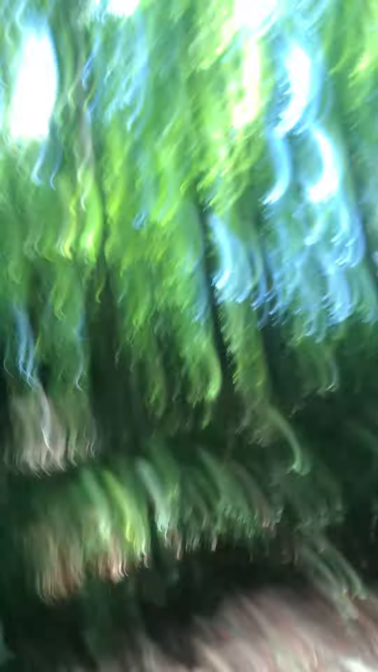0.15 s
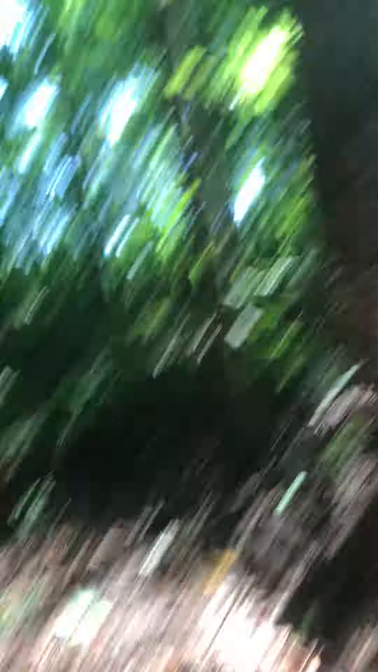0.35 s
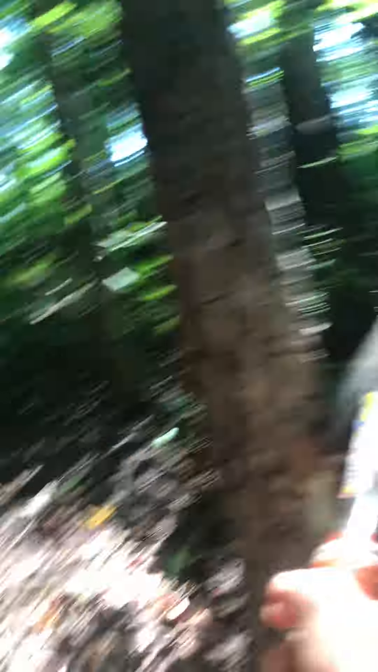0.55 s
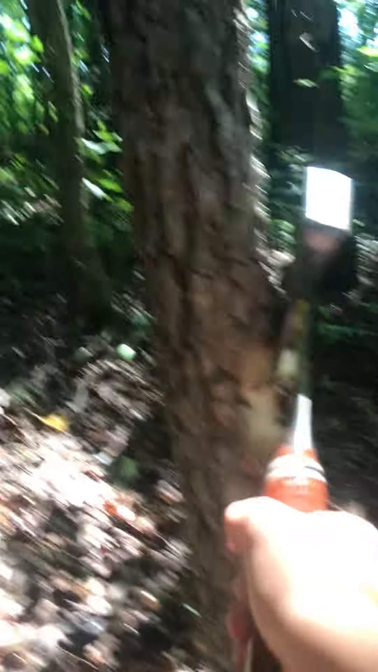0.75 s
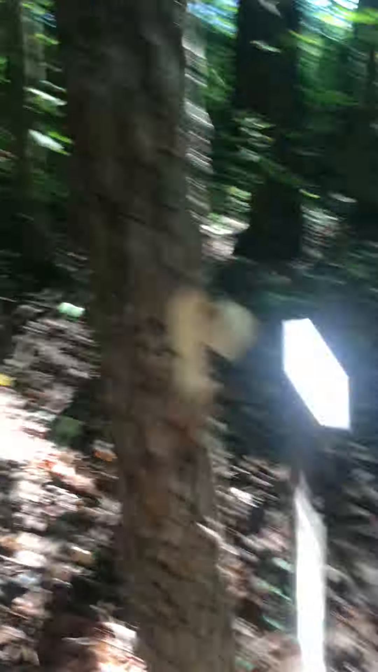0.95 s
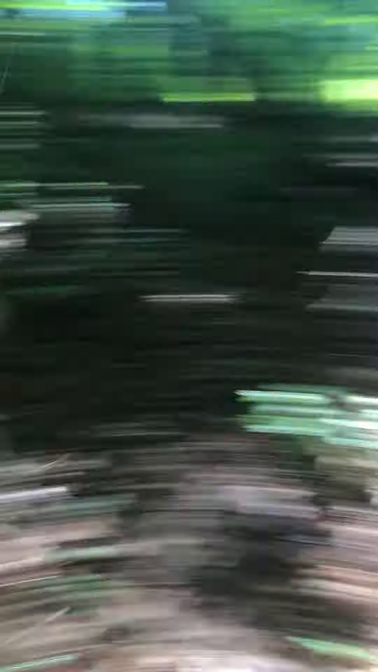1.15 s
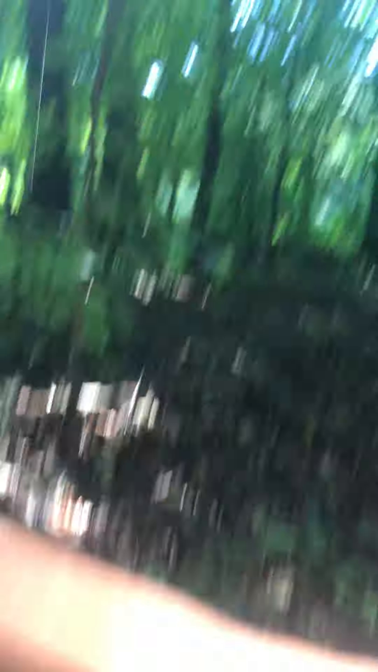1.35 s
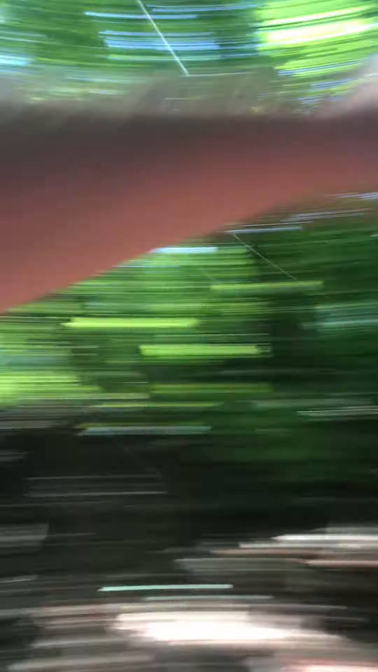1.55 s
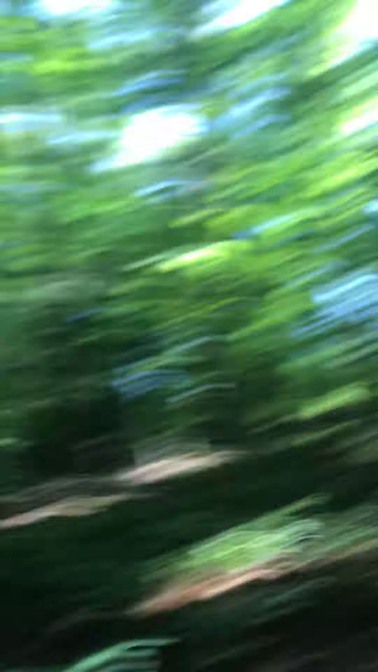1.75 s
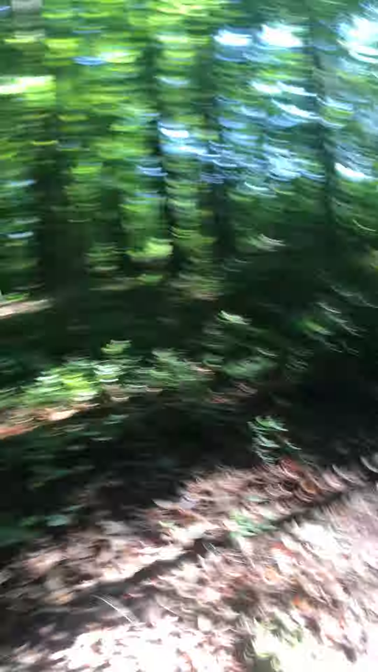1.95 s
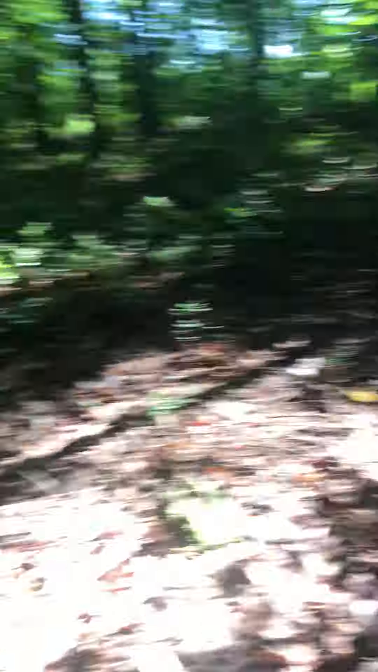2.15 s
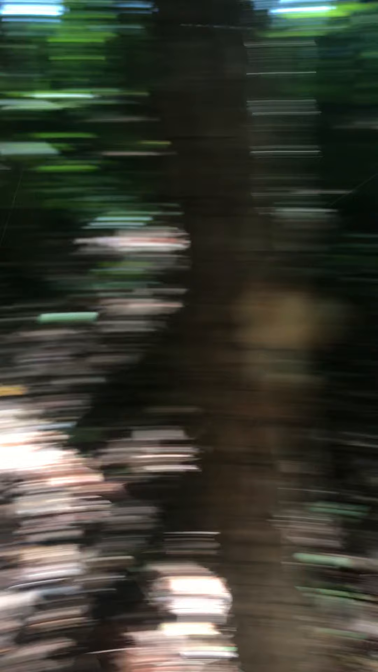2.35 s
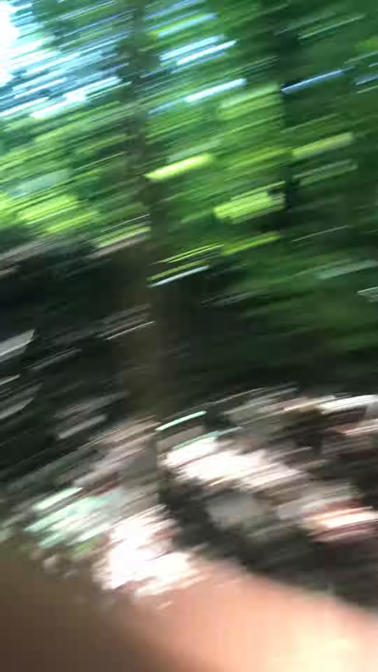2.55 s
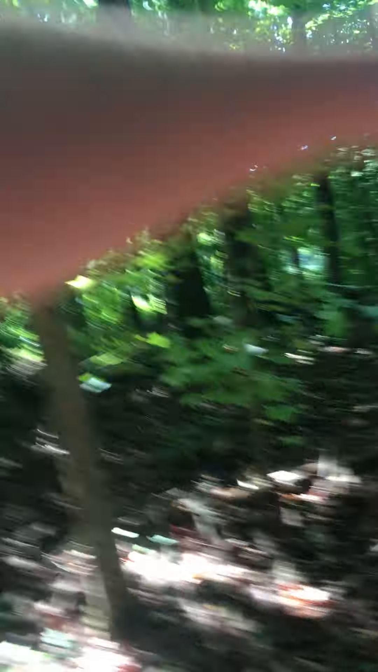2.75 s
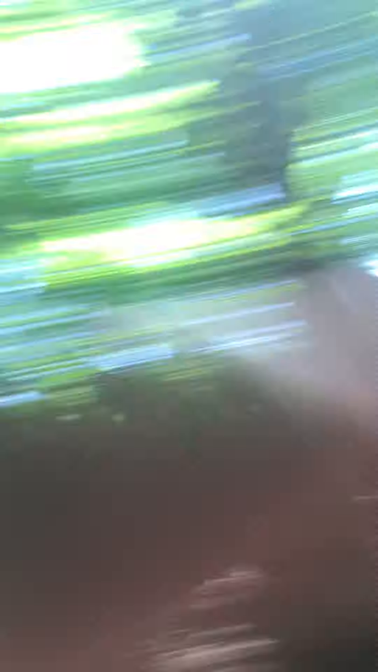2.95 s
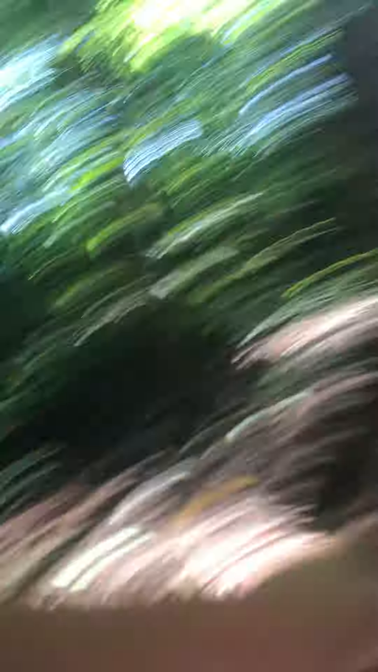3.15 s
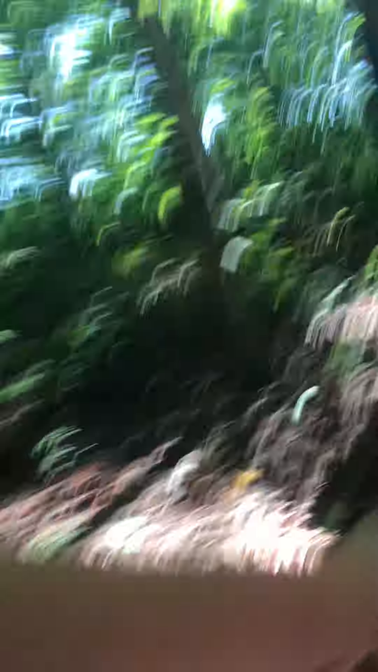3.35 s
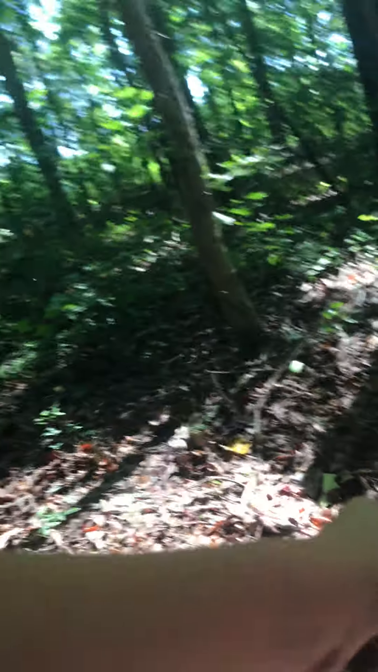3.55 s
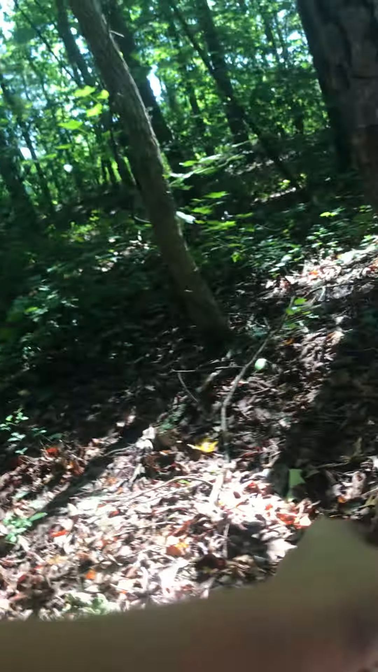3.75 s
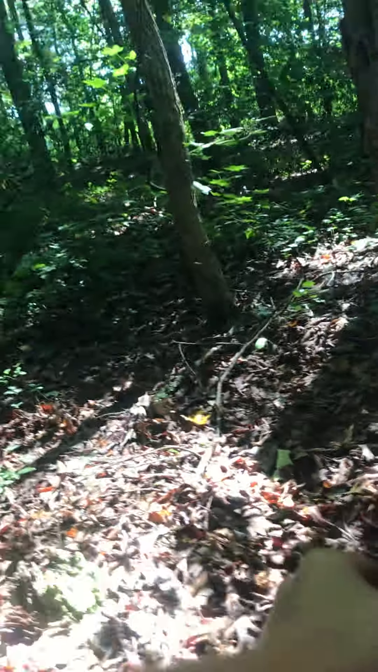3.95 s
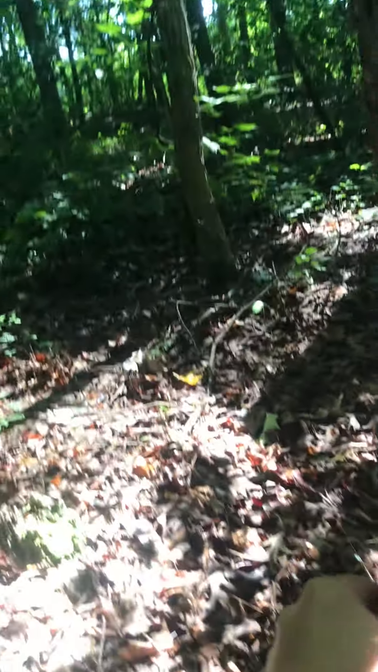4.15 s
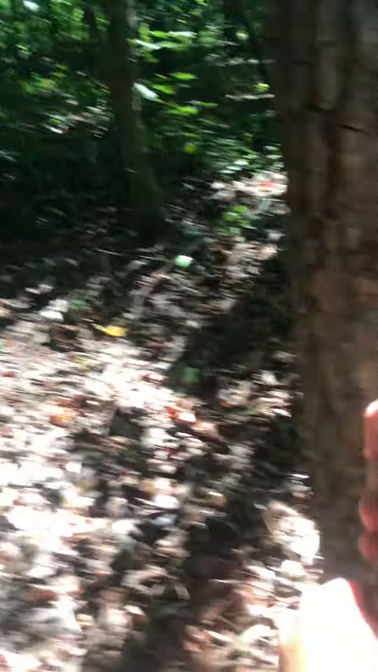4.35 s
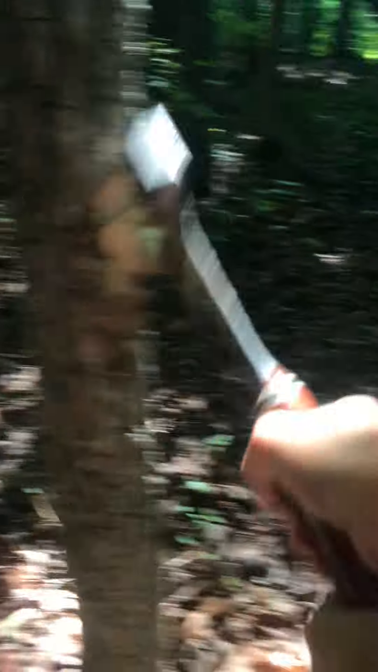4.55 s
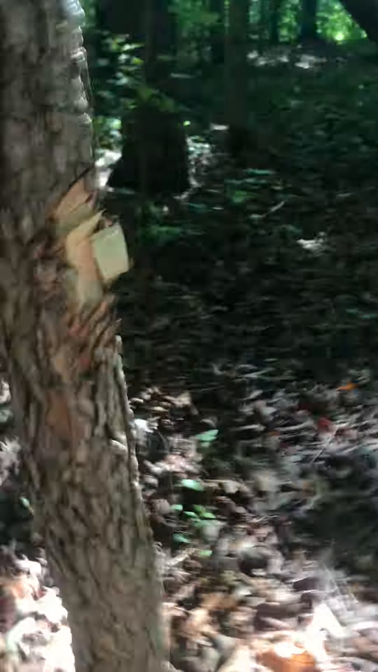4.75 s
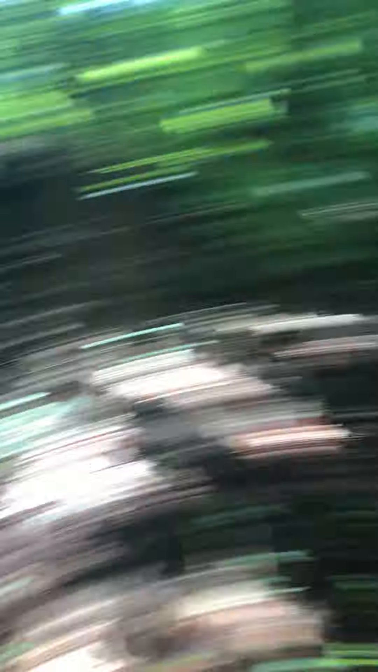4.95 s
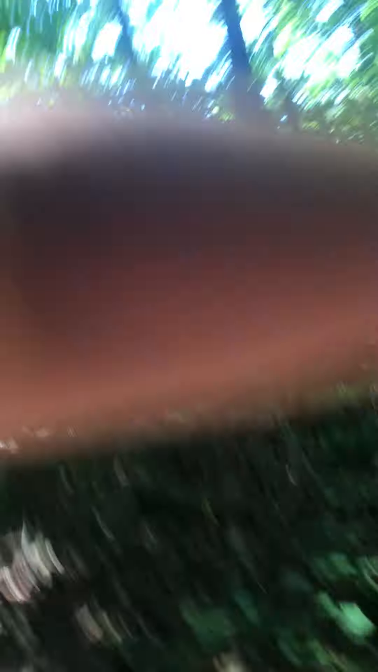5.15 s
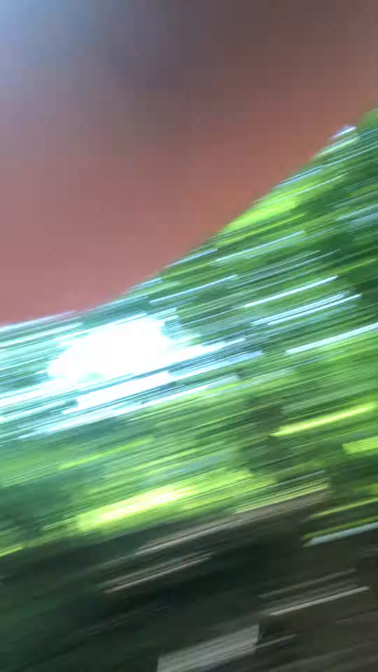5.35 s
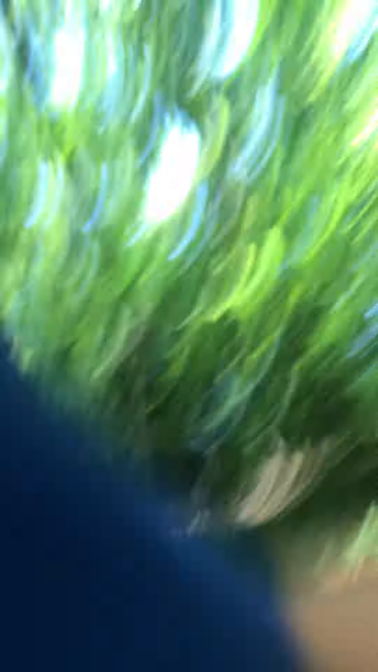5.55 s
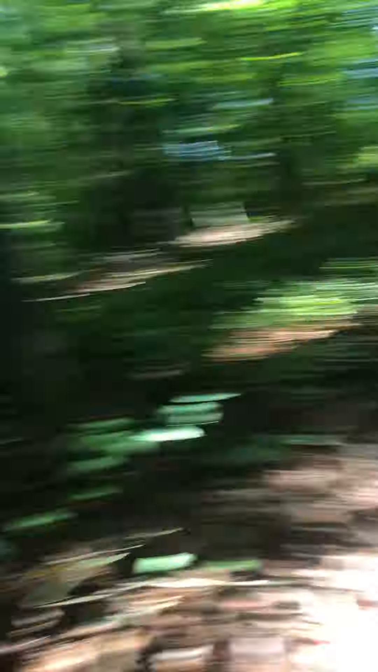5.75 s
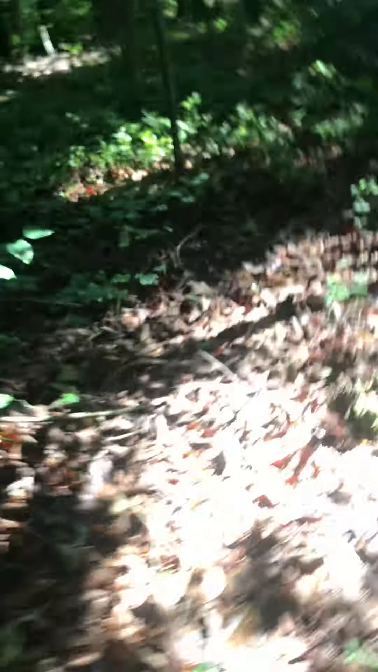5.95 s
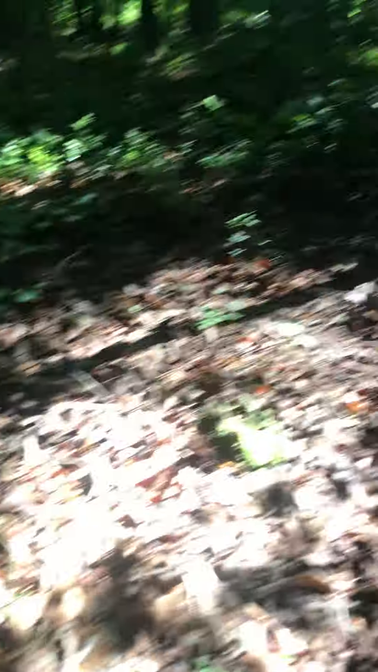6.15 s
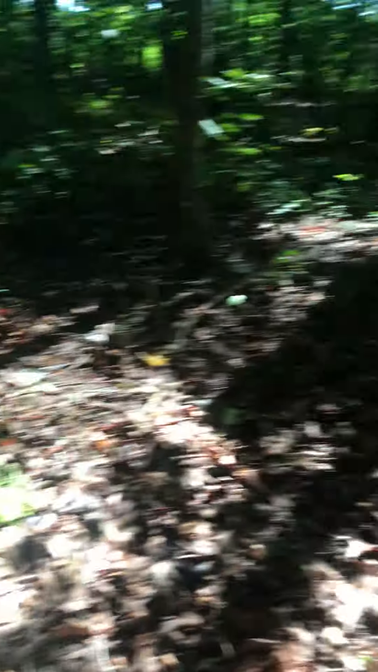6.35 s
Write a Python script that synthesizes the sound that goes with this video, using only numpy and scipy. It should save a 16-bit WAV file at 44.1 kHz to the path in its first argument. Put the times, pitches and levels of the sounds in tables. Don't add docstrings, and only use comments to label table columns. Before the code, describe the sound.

A phone moving with the arm hears a hatchet cut a small trunk in a quiet wood. Sleeve rustle and low shaking rise at once, with snaps and heavy bumps, into a firm chop at 0.24 s: bright bite, brief woody ring, late deep jolt. Chips tick and the head knocks back softly at 0.5. Near-quiet follows, with a faint far squeak around 0.9, then scuffing swells from 1.0 to a softer-biting chop at 1.84 and a gentle knock at 2.1. Rubbing builds again to a duller, deeper chop at 3.11, with a lower, louder knock at 3.37. A calmer stretch has faint leaf and insect hiss, then twig and housing ticks around 4.2-4.5. Cloth strokes grow through 4.6-5.5, rushing brightly into the hardest chop at 5.63. A quick knock and thud come at 5.9, then faint rustles until about 6.4.

```python
import sys
import numpy as np
from scipy import signal
from scipy.fft import rfft, irfft
from scipy.io import wavfile
from scipy.ndimage import uniform_filter1d, minimum_filter1d

SR = 44100
rng = np.random.default_rng(int(sys.argv[2]) if len(sys.argv) > 2 else 0)


def unload_audio(sound):
    columns = np.transpose(np.atleast_2d(sound))
    steps = np.round(np.clip(columns, -1, 1) * 32767)
    wavfile.write(sys.argv[1], SR, steps.astype(np.int16))


def undo_db(level):
    steps = np.asarray(level, float) / 20
    return 10 ** steps


N = 286650

BLOW_S = [.2384, 1.8402, 3.1124, 5.6317]
# (time [s], knock level [dB], knock pitch [Hz], thud level [dB], thud delay [s])
REBOUNDS = [
    (0.4836, -21, 330, -27.5, 0.02),
    (2.1017, -24, 330, -28, 0.023),
    (3.366, -17, 240, -20, 0.0135),
    (5.895, -17, 265.5, -23.5, .011),
]
# (time [s], level [dB], rise [s per 20 dB], tremble level [dB])
SHUDDERS = [
    (.09, -33.5, 0.05, -39),
    (1.785, -29, -0.06, -55.5),
    (3.032, -34, 0.0649, -41.5),
    (5.57, -35.5, 0.12, -40),
]


def colour(x, points):
    hz, db = np.transpose(points)
    f = np.maximum(np.arange(N // 2 + 1) * SR / N, 1)
    gain_db = np.interp(np.log(f), np.log(hz), db, left=-90, right=-90)
    y = irfft(rfft(x) * undo_db(gain_db), N)
    return y / y.std()


def walk(rate_hz):
    k = int(SR / rate_hz)
    y = uniform_filter1d(np.repeat(rng.standard_normal(N // k + 1), k), k)[:N]
    return y / y.std()


def add(out, s, wave):
    i = int(s * SR)
    out[i:i + len(wave)] += wave[:N - i]


def ring(hz, t60_s, rise_s, sag_per_s, grip=1.7):
    t = np.arange(int(t60_s * SR)) / SR
    build_up = 1 - np.exp(-(t / rise_s) ** 2.2)
    smother_db = -60 * (t / t60_s) ** grip
    return build_up * undo_db(smother_db) * np.sin(2 * np.pi * hz * t * (1 - sag_per_s * t))


def burst(hz, width, t60_s):
    t = np.arange(int(t60_s * SR) + 128) / SR
    edges_hz = np.clip([hz / (1 + width), hz * (1 + width)], 50, .45 * SR)
    band = signal.butter(2, edges_hz, "bandpass", fs=SR, output="sos")
    port = signal.butter(2, 6500, fs=SR, output="sos")
    envelope = undo_db(-60 * t / t60_s) * np.minimum(t / 0.000067, 1)
    noise = rng.standard_normal(size=8192)[:len(t)]
    y = signal.sosfilt(np.vstack([band, port]), noise * envelope)
    return y / np.abs(y).max()


def bump(t, s, db, rise, fall, hold_s=0):
    before = np.maximum(s - t, 0) / max(rise, 1e-3)
    after = np.maximum(t - s - hold_s, 0) / max(fall, 1e-3)
    return undo_db(2 * np.maximum(db - 20 * (before + after), -150))


def hatchet():
    # (pitch [Hz], t60 [s], delay [s], rise [s], first swing [+-1], pitch sag [1/s])
    modes = [
        (1650, .008, 0, .0002, -1, 0),
        (1120, .010, .0005, .0003, 1, 0),
        (690, .016, .0015, .0004, 1, 0),
        (410, .024, .0023, .002, 1, 0),
        (218, .035, .0002, .0022, -1, 0),
        (56, .08, .0094, .0045, -1, 3),
    ]
    # (bite level [dB], then six mode levels [dB])
    blows = [
        (-10, -9, -3.5, -1, -4, 1.5, -1),
        (-18, -3.5, -10, -4, -2, 3, -2.5),
        (-15, -6.5, -14.5, -2.5, -7, 2.5, 2),
        (-6, -6, 0, 1, 0, 3.5, 1),
    ]
    cut_pitch = [1.03, .8, 1.13, 1.04]
    trunk_pitch = [1.07, .97, 1.001, 1.09]
    jolt_pitch = [1.001, 1.001, 1.001, 1.05]
    jolt_early_s = [.0015, 0, 0, .001]
    out = np.zeros(N)
    detune = 1 + .015 * rng.standard_normal((len(blows), len(modes)))
    detune[:, 2:] = np.transpose([cut_pitch, trunk_pitch, trunk_pitch, jolt_pitch])
    for s, (bite_db, *mode_db), bend, early_s in zip(BLOW_S, blows, detune, jolt_early_s):
        add(out, s, undo_db(bite_db) * burst(2700, .8, .011))
        add(out, s + 0.002, undo_db(bite_db - 1.5) * burst(540, 0.3, 0.026))
        add(out, s + 0.004, undo_db(bite_db - 11) * burst(310, 0.3, 0.04))
        add(out, s + 0.00079, undo_db(bite_db - 2.5) * burst(950, 0.28, .018))
        add(out, s, undo_db(bite_db - 34) * burst(13000, .26, .008))
        for db, (hz, t60_s, delay_s, rise_s, swing, sag), share in zip(mode_db, modes, bend):
            is_jolt = sag > 0
            grip = 1.2 if is_jolt else 1.7
            wave = ring(hz * share, t60_s, rise_s, sag, grip)
            add(out, s + delay_s - early_s * is_jolt, swing * undo_db(db) * wave)
    return out


def jolts():
    knock_sags = [12.7, 12.7, 7.4, 22.6]
    # (time [s], level [dB], pitch [Hz], t60 [s])
    pushes = [(.112, -23, 50, 0.18), (.2025, -6, 80, .055), (1.8305, -18, 110, .05),
              (5.6225, -20, 350, .04), (.119, -27, 380, .05), (1.69, -36, 70, .15), (3.3715, -27, 150, .05),
              (1.564, -32.5, 393, .044), (1.653, -43, 423, .039), (2.1525, -29.5, 381, .017),
              (2.685, -43.5, 648, .17), (2.755, -39.5, 473, .13), (2.892, -36.5, 295, 0.036),
              (1.832, -16, 300, .05), (1.816, -19, 420, .03), (3.1, -8.5, 58.2, 0.081),
              (5.602, -16, 110, 0.1), (5.6235, -13, 80, 0.05), (5.843, -32.5, 430, 0.032)]
    # (time [s], level [dB], pitch [Hz], t60 [s])
    pulls = [(.178, -12.5, 650, 0.075), (.2108, -2.5, 112, 0.055), (.2205, -5, 52, .11),
             (.2135, -14, 380, .04), (.4854, -14.5, 179, 0.048), (.513, -28, 180, 0.038),
             (.5032, -27, 200, .035), (.1075, -20, 130, .06), (1.826, -18, 150, .03), (5.617, -16, 85, .04),
             (1.621, -32, 106, 0.038), (1.808, -16, 242, 0.021), (2.11, -16.5, 112, 0.041),
             (3.0575, -15.5, 591.9, 0.038), (3.068, -7.5, 63.6, .13), (5.845, -27, 183.8, 0.056),
             (5.852, -31.5, 62, 0.21), (2.124, -25, 250.3, 0.032)]
    out = np.zeros(N)
    for (s, db, hz, *_), sag in zip(REBOUNDS, knock_sags):
        add(out, s, undo_db(db) * ring(1.129 * hz, 0.027, 0.00069, sag))
        add(out, s - .01, undo_db(db - 52) * burst(10000, .6, .12))
    thuds = [(s + delay_s, db, hz / 4.53, 0.12) for s, _, hz, db, delay_s in REBOUNDS]
    t = np.arange(SR // 2) / SR
    tremble = np.minimum(t / .02, 1) * undo_db(-60 * t / 0.3) * np.sin(2 * np.pi * 31.3 * t)
    for s, (*_, db) in zip(BLOW_S, SHUDDERS):
        add(out, s + 0.034, undo_db(db) * tremble)
    for swing, rows in ((0.98, pushes), (-1, list(pulls) + thuds)):
        for s, db, hz, t60_s in rows:
            add(out, s, swing * undo_db(db) * ring(hz, 0.47 * t60_s, 0.047 / hz, 2.1))
    return out


def snaps_and_pings():
    # (time [s], peak level [dB], centre [Hz], t60 [s])
    snaps = [(0.116, -32, 864, 0.01797), (.181, -17, 2849, 0.022), (0.198, -21, 3943, 0.0092),
             (0.204, -16.5, 3390, 0.034), (0.2087, -14, 2700, 0.02008), (1.7744, -18.5, 2760, 0.014),
             (1.7734, -16, 970, 0.015), (1.81, -27, 3000, 0.089), (3.019, -29, 1470, 0.049),
             (3.032, -30, 1080, 0.025), (3.051, -15.5, 2800, .02), (3.052, -16.5, 1330, 0.034),
             (5.5842, -18, 2530, 0.02501), (5.5823, -18, 1472, 0.02433), (5.596, -27, 3400, 0.009)]
    # (time [s], peak level [dB], centre [Hz], t60 [s])
    pings = [(.1805, -17, 3000, .02), (.181, -17, 1500, .022), (.2095, -17, 2700, .02),
             (.209, -16, 1300, .025), (1.7735, -13.5, 2750, 0.016), (1.7735, -22.5, 5900, .014),
             (1.773, -20, 4400, .012), (1.809, -26, 2900, .015), (3.0505, -15.5, 2800, .018),
             (3.051, -16, 1700, .02), (3.052, -21, 5640, 0.018), (3.032, -24, 1150, 0.034),
             (5.583, -16, 2730, .02), (5.582, -19.5, 1450, .022), (.482, -34.5, 1070, 0.014),
             (.512, -44, 1070, .014), (.5, -47, 900, .014), (2.102, -34, 810, 0.017),
             (2.107, -38, 1100, 0.011), (2.123, -41, 1540, 0.011), (2.151, -42, 900, 0.012),
             (3.364, -42, 900, .014), (3.371, -54, 1800, .01), (5.894, -42, 1040, 0.015),
             (5.844, -39.5, 780, .02), (3.135, -30, 1100, .012), (1.1, -48, 600, 0.033),
             (1.3, -51, 1530, .03), (1.185, -43.5, 620, .04), (1.445, -54, 2900, .04),
             (1.545, -48, 780, .025), (1.653, -45, 720, .03), (1.7745, -25, 1150, .02),
             (5.602, -24, 900, .03), (5.02, -46, 1300, .08), (5.08, -45, 700, .08), (.199, -22, 1200, .015),
             (.228, -24, 1200, .02), (3.157, -40, 900, .012), (1.447, -42, 600, .03),
             (.4825, -36, 620, .02), (1.844, -14, 800, .016), (.765, -52, 5600, .02), (2.23, -52, 550, .08),
             (5.05, -46, 1800, .09), (5.56, -27, 900, .04), (1.23, -57, 2600, .04), (4.67, -56, 2700, .06),
             (5.215, -49, 2600, .04), (5.3, -51, 2800, .04), (2.662, -47, 800, .03), (3.006, -33, 900, .03)]
    # (time [s], level [dB], pitch [Hz], t60 [s])
    tinks = [(5.6335, -9, 1000, .012), (.2388, -8, 1250, .012), (.2088, -22, 2700, .012),
             (.291, -46, 1400, .008), (.27, -48, 2200, .006), (1.8404, -10, 1750, .01),
             (1.81, -30, 3000, .01), (3.1128, -12, 1700, .01), (3.113, -24, 4000, .006),
             (3.054, -26, 5800, .01), (3.372, -52, 1900, .006), (5.585, -28, 5600, .012),
             (5.5955, -14, 4200, .004), (5.615, -36, 5700, .015), (5.632, -14, 3000, .007),
             (5.632, -20, 4600, .006), (5.632, -16, 2200, .007)]
    out = np.zeros(N)
    for s, db, hz, t60_s in snaps:
        add(out, s, undo_db(db) * burst(hz, 0.84, t60_s))
        add(out, s, undo_db(db - 31) * burst(12500, .3, .014))
    for s, db, hz, t60_s in pings:
        add(out, s, undo_db(db) * burst(hz, 0.14, t60_s))
    for s, db, hz, t60_s in tinks:
        add(out, s, undo_db(db) * ring(hz, t60_s, .0003, 0))
    return out


def ticks():
    # (time [s], peak level [dB], centre [Hz])
    chips = [(.269, -48, 2000), (0.289, -44.5, 2180), (.36, -54.5, 5010), (.389, -47.5, 5600),
             (0.483, -46, 1800), (.493, -56, 3940), (.567, -59, 1754), (1.85, -32, 4595),
             (1.859, -24.5, 4400), (1.874, -41, 2450), (1.944, -54, 1090), (2.104, -39.5, 1497),
             (2.11, -50, 3010), (2.122, -42.5, 2000), (2.152, -55, 1600), (3.136, -33, 1800),
             (3.141, -46, 4730), (3.155, -52, 2200), (3.367, -46, 1014), (3.374, -54.5, 2510),
             (5.841, -49.5, 2522)]
    # (time [s], peak level [dB], centre [Hz])
    twigs = [(0.657, -60, 4240), (.68, -60, 3650), (.765, -45, 2090), (.766, -53, 5500), (1.448, -45, 588),
             (2.239, -57.5, 1480), (2.663, -46, 730), (2.745, -60, 1520), (2.864, -50, 1620),
             (3.59, -62, 4020), (3.703, -59, 699), (4.16, -46.5, 5190), (4.253, -40.5, 1798),
             (4.299, -63.5, 1402), (4.357, -49.5, 7000), (4.367, -57, 6500), (4.374, -46, 4200),
             (4.39, -32.5, 1667), (4.402, -35.5, 3938), (4.422, -42, 2190), (4.461, -36.5, 2070),
             (4.478, -34.5, 2130), (4.495, -49, 3000), (4.515, -43, 1973), (4.748, -54.5, 5170),
             (6.063, -56, 4040), (6.188, -58.5, 2494)]
    # (time [s], level [dB], pitch [Hz], t60 [s])
    squeak_s, squeak_db, squeak_hz, squeak_t60_s = (.886, -60, 2680, .1)
    out = np.zeros(N)
    for rows, edge_db, edge_hz, edge_width in ((chips, -34, 12000, .4), (twigs, -22.5, 9600, .08)):
        for s, db, hz in rows:
            t60_s = .009 * (2500. / hz) ** 0.57
            add(out, s, undo_db(db) * burst(hz, .75, t60_s))
            add(out, s, undo_db(db + edge_db) * burst(edge_hz, edge_width, t60_s))
    add(out, squeak_s, undo_db(squeak_db) * burst(squeak_hz, 0.017, squeak_t60_s))
    return out


def slips(share, scatter_db):
    return (rng.random(N) < share) * rng.standard_normal(N) * undo_db(scatter_db * rng.exponential(size=N))


def scuffs(share, width_hz):
    out = 0
    for hz in np.linspace(150, 2300, num=18):
        b, a = signal.iirpeak(hz, hz / width_hz, fs=SR)
        out = out + signal.lfilter(b, a, slips(share, 0.99)) * undo_db(2.5 * walk(14))
    return out


def patchy(share, scatter_db, shared_db, own_db):
    out, common_db = 0, shared_db * walk(60)
    for hz in 700 * 1.5 ** np.arange(9):
        edges_hz = [hz / 1.225, min(hz * 1.225, .45 * SR)]
        band = signal.butter(2, edges_hz, "bandpass", fs=SR, output="sos")
        out = out + signal.sosfilt(band, slips(share, scatter_db)) * undo_db(common_db + own_db * walk(30))
    return out


def cloth_moves(t):
    # (time [s], rubbing [dB], brightness [dB], rise [s per 20 dB], fall [s per 20 dB])
    scrapes = [(0.019, -51.5, -19.5, 0.014, 0.047), (0.116, -36, -10.5, 0.0067, 0.033),
               (.19, -20.5, -19.5, 0.014, 0.016), (.218, -17.5, -27, .01, .008), (1.035, -58, -5, .01, .25),
               (1.655, -50, -6, .012, .3), (1.467, -42, -19.5, 0.076, .11), (1.566, -52, -9, .006, 0.044),
               (2.438, -52.5, -15, 0.12, 0.028), (2.975, -51, -13.5, 0.11, 0.072),
               (3.46, -62.5, -4, 0.14, .008), (3.87, -66, -9, .02, 0.51), (4.871, -42.5, -13, 0.043, 0.094),
               (5.845, -47, -6, 0.016, 0.095), (6.064, -61.5, -1, .008, 0.042), (6.196, -55, -6, .02, 0.1),
               (6.352, -58.5, -5.5, 0.063, 0.5)]
    # (middle [s], rubbing [dB], brightness [dB], fade [s to -20 dB])
    strokes = [(.27, -64.5, 3.5, 0.02), (.652, -59, -10.5, 0.045), (.85, -74, 7, 0.08),
               (.922, -61, -12.5, 0.05), (1.19, -57, -11.5, .08), (1.32, -56, -11, 0.1),
               (1.88, -59.5, 3.5, 0.0753), (2.239, -60, -11.5, 0.27), (2.36, -60.5, -10.5, 0.23),
               (2.485, -56.5, -3, 0.08), (2.699, -48.5, -18.5, 0.11), (2.765, -51.5, -18.5, 0.09),
               (3.17, -60.5, -2.5, -0.05), (3.44, -66.5, -2, -0.16), (4.11, -58.5, -14, 0.16),
               (4.29, -58, -13, 0.15), (4.41, -60.5, 3.5, -0.05), (4.519, -52, -5.5, 0.04),
               (4.609, -49.5, -12.5, 0.0944), (4.72, -51, -9, 0.1), (5.0, -46, -3, .06),
               (5.051, -44, -4, 0.1), (5.1, -46.5, -4.5, .07), (5.155, -50.5, -4, .05),
               (5.23, -56, -2.5, 0.09), (5.37, -51.5, -11.5, 0.2), (5.673, -53, 5.5, 0.023),
               (6.01, -60, -13, 0.26)]
    # (full speed [s], rubbing [dB], brightness [dB], climb [s per 20 dB], rustle after blow [dB])
    swings = [
        (.175, -29.5, -9, 0.09, -37),
        (1.77, -30, -6, 0.0735, -38),
        (3.031, -30, -8.5, 0.0573, -40.5),
        (5.556, -30.5, -2, .04, -36),
    ]
    moves = [(bump(t, s, db, rise, fall), bright_db) for s, db, bright_db, rise, fall in scrapes]
    for s, db, bright_db, fade_s in strokes:
        moves.append((undo_db(2 * (db - 20 * ((t - s) / fade_s) ** 2)), bright_db))
    brace_s, dip_s, after_s = .014, .047, .02
    for blow_s, (s, db, bright_db, climb, after_db) in zip(BLOW_S, swings):
        dip = undo_db(2 * -12 * np.exp(-((t - blow_s + dip_s) / 0.0038) ** 2))
        moves.append((dip * bump(t, s, db, climb, .022, blow_s - brace_s - s), bright_db))
        moves.append((bump(t, blow_s + after_s, after_db, after_s, 0.068), -19))
    for s, *_ in REBOUNDS:
        moves.append((bump(t, s, -47.5, 0.029, 0.059), -21))
    return moves


def housing_shake(t, arm_power):
    # (time [s], level [dB], rise [s per 20 dB], fall [s per 20 dB])
    sways = [(.02, -47, 0.065, 0.12), (.66, -65, .06, .06), (.981, -64, .07, 0.091),
             (1.271, -50.5, 0.0772, 0.1135), (1.52, -47.5, 0.038, 0.28), (1.7, -46, 0.052, 0.15),
             (2.42, -57, 0.1, 0.35), (2.871, -47.5, 0.11, 0.28), (3.87, -60, .05, 0.95),
             (4.4, -61, 0.03175, 0.066), (4.62, -47, 0.13, 0.094), (5.0, -49, 0.34, 0.19),
             (5.22, -48, 0.21, 0.23), (6.213, -60, .07, .1), (6.33, -63, 0.028, 1.5)]
    shake = undo_db(2 * -58) * (arm_power / undo_db(-110)) ** 0.52
    shake = shake + sum(bump(t, *row) for row in sways)
    for blow_s, (s, db, rise, _) in zip(BLOW_S, SHUDDERS):
        shake = shake + bump(t, s, db, rise, .06, blow_s + .02 - s)
    for s, *_ in REBOUNDS:
        shake = shake + bump(t, s, -49, 0.029, .15)
    return shake


def motion():
    # (time [s], rubbing [dB], brightness [dB])
    arm = [(0, -61, -12), (.4, -86, -4), (.75, -86, -7.5), (1.04, -62, -9.5), (1.44, -54, -10),
           (1.64, -62.5, -4.5), (2.02, -82.5, -5.5), (2.3, -79, -8), (2.55, -57, -6.5), (2.78, -61, -11),
           (2.83, -61.5, -2.5), (3.28, -90, -2), (4.2, -80.5, -1), (4.45, -62.5, 1), (4.55, -59, -5),
           (5.45, -53.5, -8), (5.76, -65, -8), (6.5, -64.5, -11.5)]
    t = np.arange(0, N, 32) / SR
    at_s, arm_db, arm_bright_db = np.transpose(arm)
    rub = undo_db(2 * np.interp(t, at_s, arm_db))
    swish = rub * undo_db(2 * np.interp(t, at_s, arm_bright_db))
    shake = housing_shake(t, rub)
    for move, bright_db in cloth_moves(t):
        rub = rub + move
        swish = swish + move * undo_db(2 * bright_db)
    air = undo_db(2 * -22.5) * swish * (swish / undo_db(-100)) ** 0.2
    return [np.interp(np.arange(N) / SR, t, np.sqrt(power)) for power in (rub, swish, air, shake)]


def rustle():
    # (frequency [Hz], density [dB per Hz])
    rub_colour = [(76, -39.5), (130, -14), (320, -1), (489, 2), (927, -4.5), (995, -9.5), (1260, -8),
                  (1520, -15.5), (2200, -21.5), (2860, -47), (4840, -120)]
    swish_colour = [(650, -27.5), (1100, -2), (1270, 1.5), (1500, -5), (1670, -0.5), (2340, -6.5),
                    (2750, -5), (4240, -9.5), (6290, -17.5), (7500, -38.5), (9750, -53), (16500, -120)]
    air_colour = [(3820, -29), (6500, -3), (8470, -8), (9830, -5.5), (10600, -13.5), (11600, -10),
                  (14000, -22), (15800, -27), (16000, -70)]
    shake_colour = [(12, -38), (20, -7.5), (48, -0.5), (64, 4.5), (97, 1), (150, -3.5), (236, -7),
                    (260, -3.5), (340, -28.5), (570, -120)]
    rub_gain, swish_gain, air_gain, shake_gain = motion()
    rub = colour(scuffs(.004, 150) * undo_db(0.78 * walk(35)), rub_colour) * rub_gain
    fibres = patchy(.22, 1.8, .8, 2.2)
    swish = colour(fibres, swish_colour) * swish_gain
    air = colour(fibres, air_colour) * air_gain
    shake = colour(rng.standard_normal(N) * undo_db(1.6 * walk(18)), shake_colour) * shake_gain
    return rub + swish + air + shake


def high_hiss():
    t = np.arange(N) / SR
    knocks_s = list(BLOW_S) + [row[0] for row in REBOUNDS]
    power = sum(bump(t, s, -87, .015, .025, .075) for s in knocks_s)
    return colour(rng.standard_normal(N), [(7000, -12), (9000, 0), (15700, -2)]) * np.sqrt(power)


def forest():
    # (frequency [Hz], density [dB per Hz])
    leaf_colour = [(120, -30), (200, -4.5), (317, -9.5), (411, -3.5), (542, -10), (742, -7), (1180, -13.5),
                   (2560, -24.5), (2960, -23.5), (5870, -16), (7600, -34), (12000, -35.5), (15800, -37),
                   (16000, -70)]
    level_db, duck_db, recover_s = -67.5, -16, .5
    t = np.arange(N) / SR
    ducking_db = sum(duck_db * np.exp(-np.maximum(t - s, 0) / recover_s) * (t > s) for s in BLOW_S)
    return colour(rng.standard_normal(N), leaf_colour) * undo_db(level_db + ducking_db + 0.66 * walk(1))


def scene():
    return (hatchet() + jolts() + snaps_and_pings() + ticks() + rustle() + high_hiss() + forest())[None]


def band_limit(x):
    return signal.sosfilt(signal.butter(12, 16800, fs=SR, output="sos"), x)


def record(dry):
    ceiling, hold_s = .69, .0022
    x = signal.sosfilt(signal.butter(3, 26, "highpass", fs=SR, output="sos"), dry)
    k = int(hold_s * SR)
    gain = minimum_filter1d(np.minimum(1, ceiling / (np.abs(x) + 1e-9)), 2 * k + 1)
    return band_limit(x * uniform_filter1d(gain, k))


dry = scene()
out = record(dry)
unload_audio(out)
```